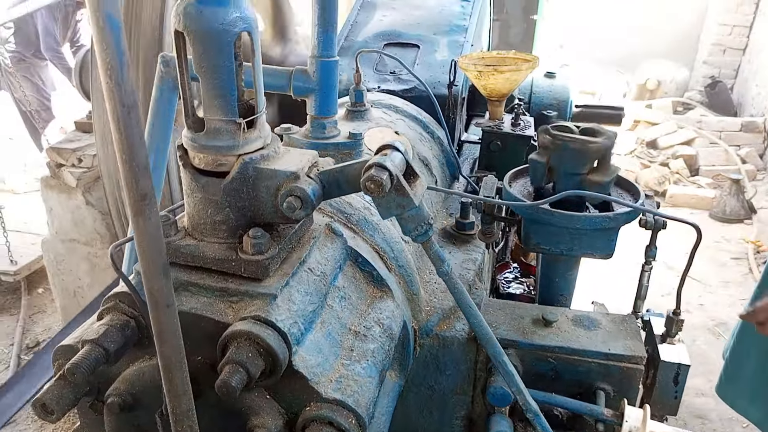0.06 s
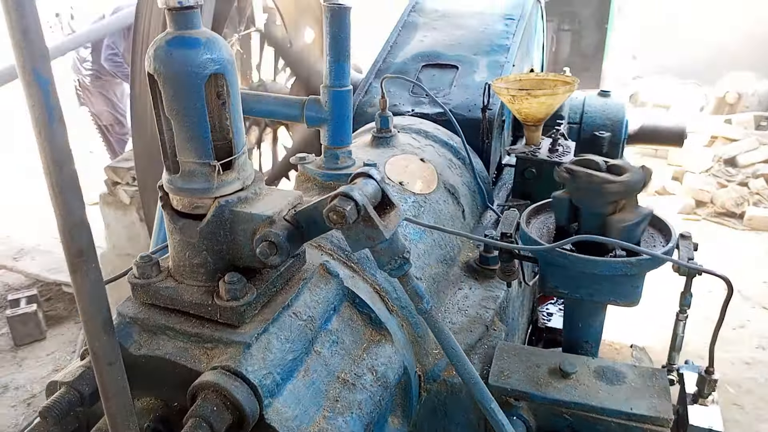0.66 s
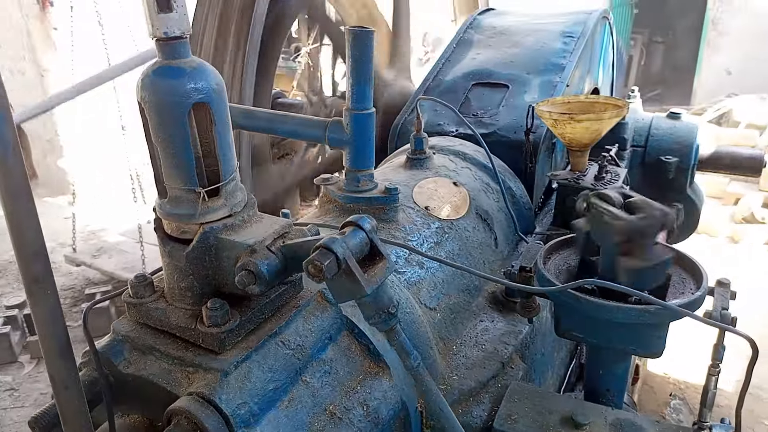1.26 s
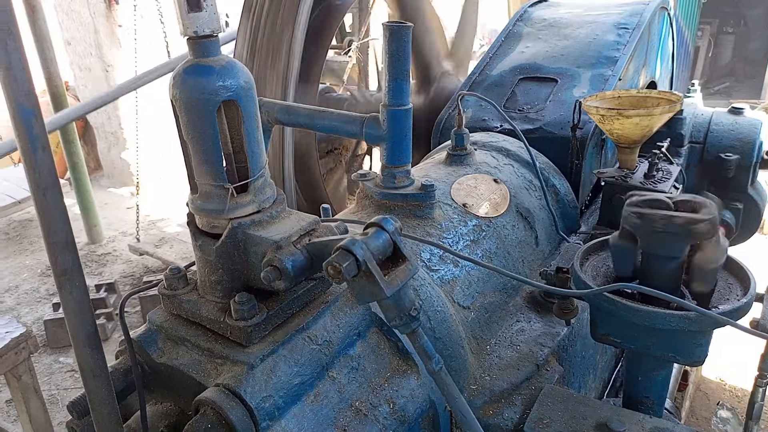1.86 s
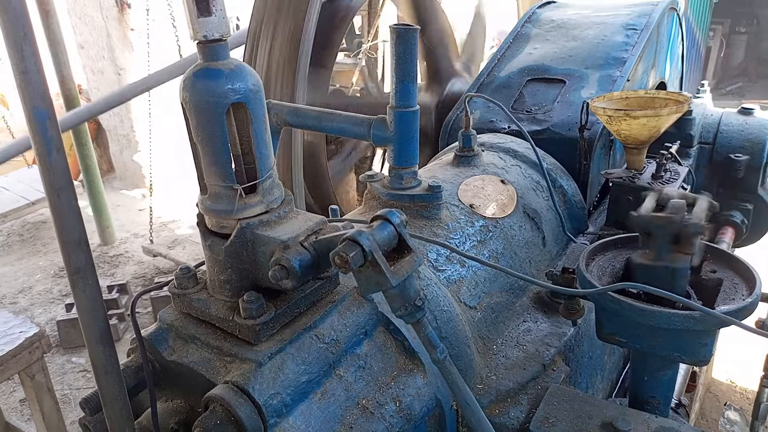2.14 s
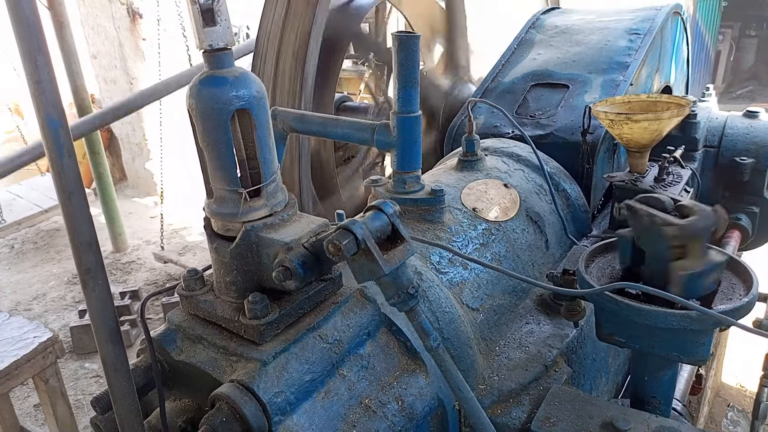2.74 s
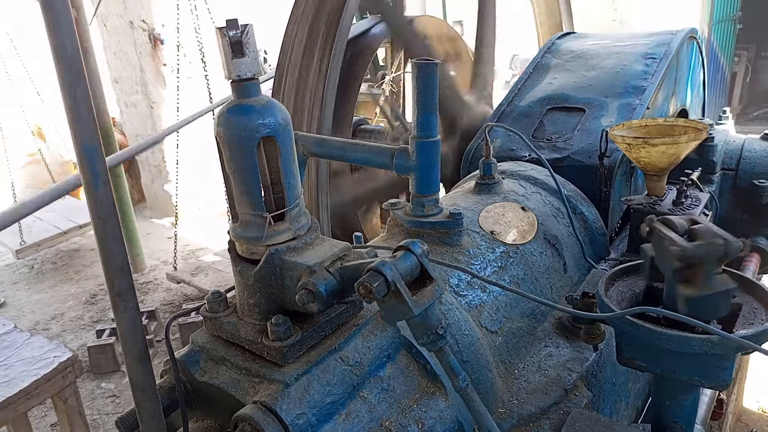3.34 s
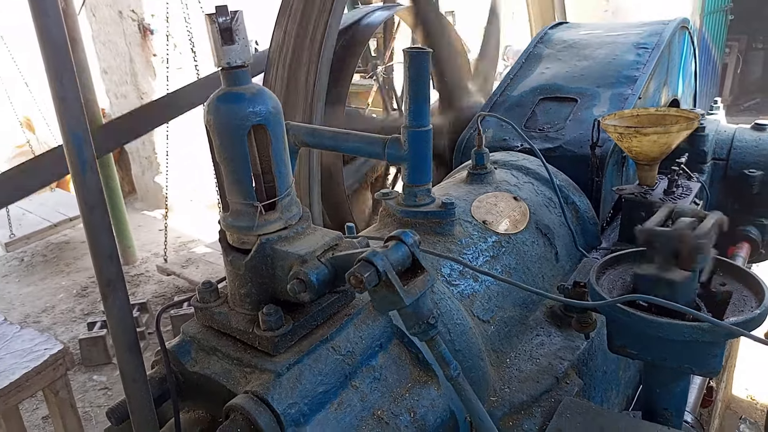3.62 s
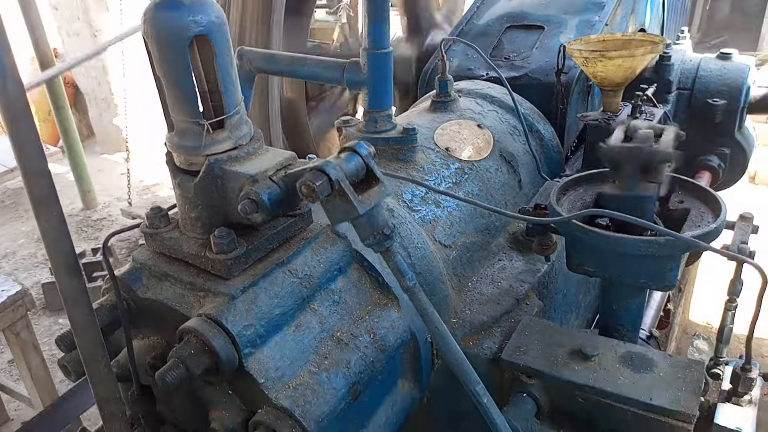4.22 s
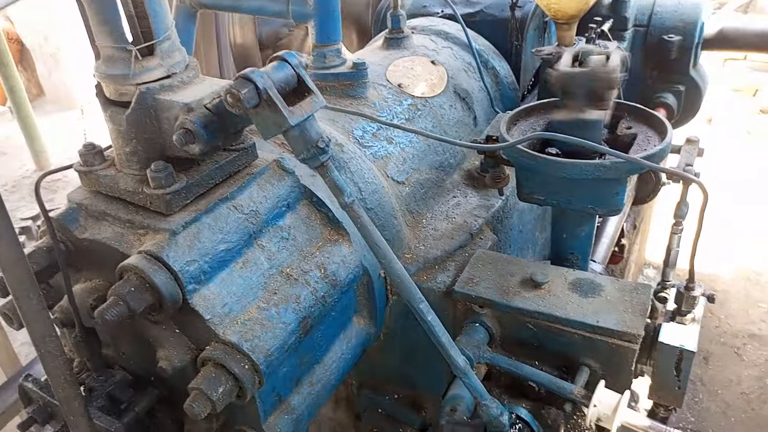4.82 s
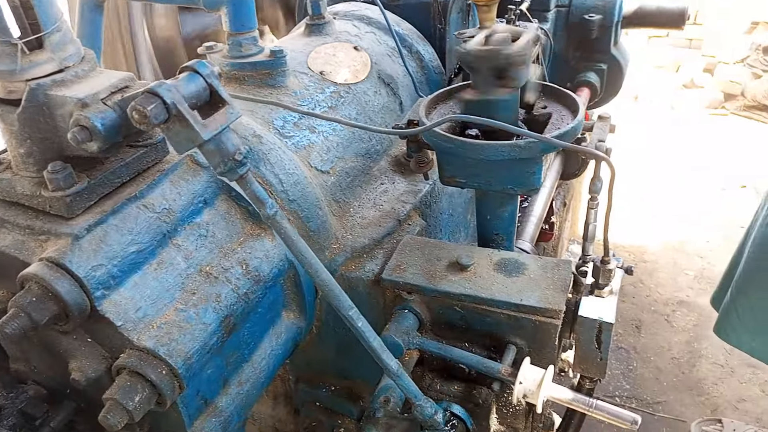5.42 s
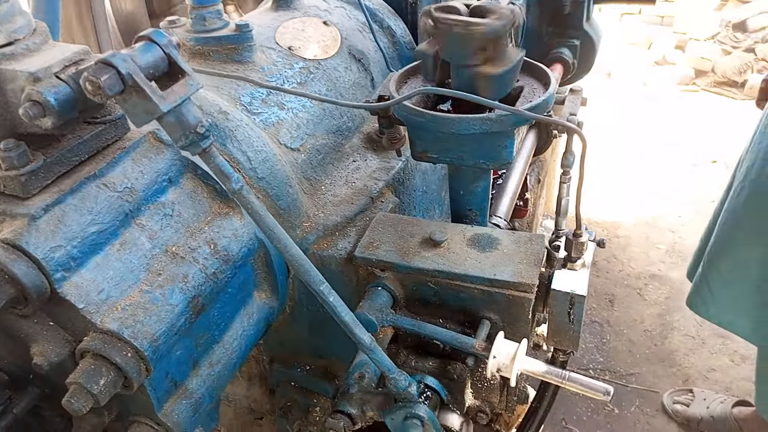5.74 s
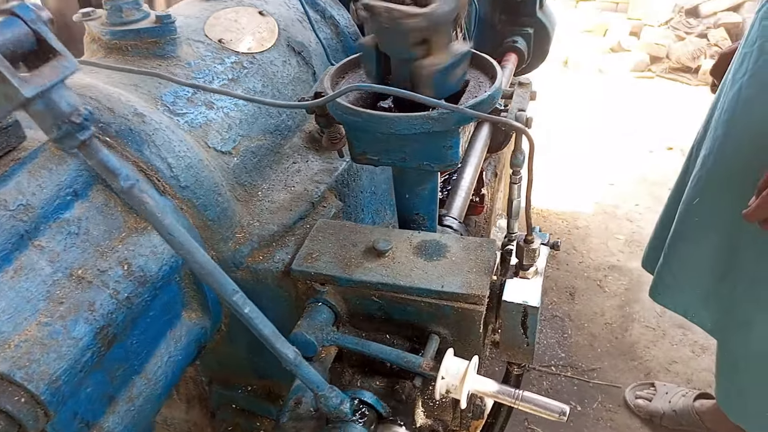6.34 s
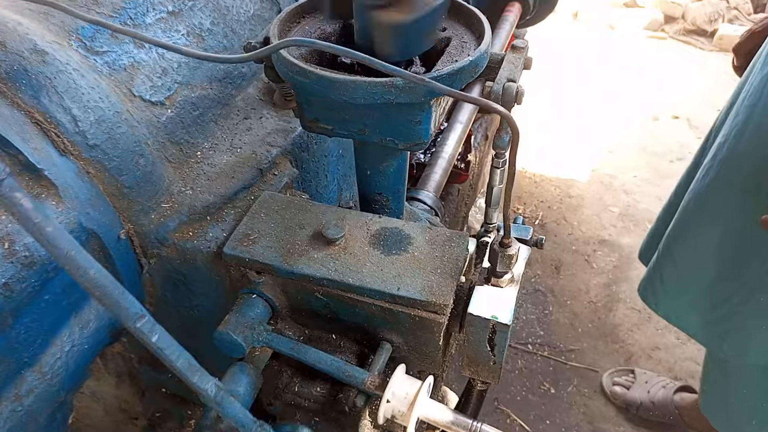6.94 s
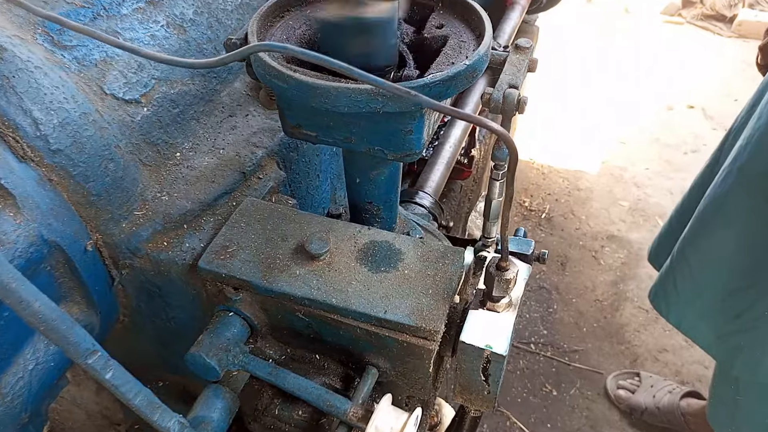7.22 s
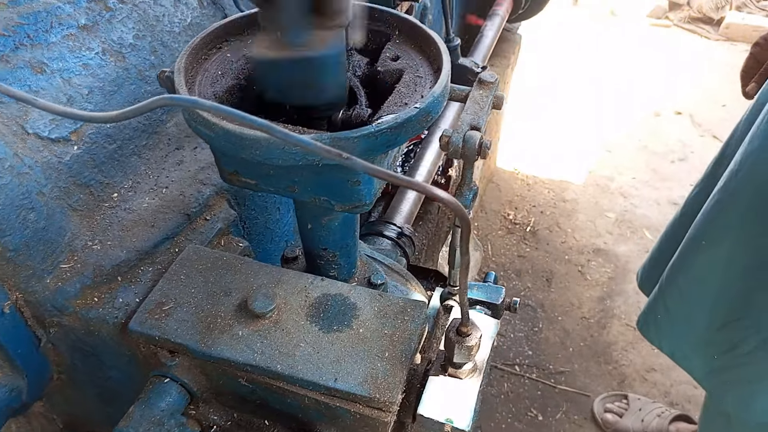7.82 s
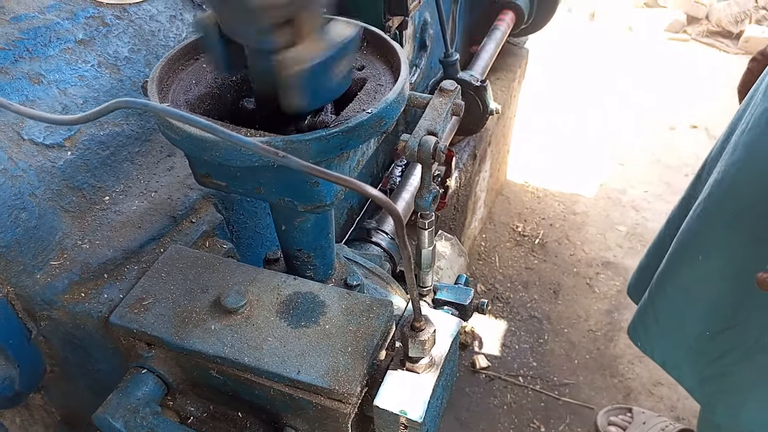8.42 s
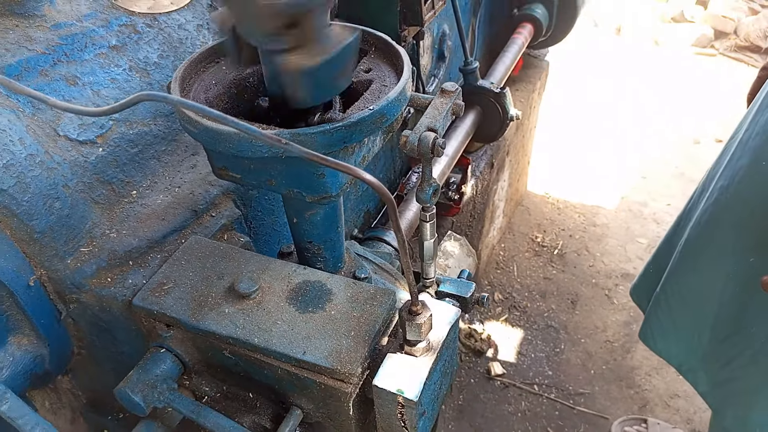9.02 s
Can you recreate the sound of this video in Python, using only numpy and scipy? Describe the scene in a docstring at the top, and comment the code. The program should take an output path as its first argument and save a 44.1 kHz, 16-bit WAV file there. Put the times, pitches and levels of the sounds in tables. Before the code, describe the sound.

An old slow-running diesel engine knocks and clatters evenly, about two beats a second, with exhaust chuffs and light metallic clinks.

```python
"""A slow, heavy clatter and chuff, about two beats a second: a big single-cylinder diesel in a workshop.
In each four-stroke cycle the intake gulps, the firing excites the modes of the cast iron and the hollow
crankcase, a tappet clicks, and the exhaust releases a pulse of gas. Behind these, gears sizzle, the
flywheel rumbles, dry spots squeal by stick and slip, and loose links clink. The balance of the modes
shifts as the listener moves from the cylinder head along the barrel to the governor."""
import sys
import numpy as np
from scipy import signal
from scipy.fft import rfft, irfft
from scipy.io import wavfile
from scipy.ndimage import uniform_filter1d

SR = 44100
rng = np.random.default_rng(int(sys.argv[2]) if len(sys.argv) > 2 else 0)


def bounce(signal):
    """Save signal as a 16-bit WAV file at the path given by the first command-line argument."""
    frames = np.transpose(np.atleast_2d(signal))
    limited = np.clip(frames, -1, 1)
    pcm = np.round(limited * 32767).astype(np.int16)
    wavfile.write(sys.argv[1], SR, pcm)


N = 399987
TAPS, SHOT = 4096, 16384  # samples in a filter and in one event
FREQ = np.maximum(np.arange(TAPS // 2 + 1) * SR / TAPS, 1)
AGE = np.arange(SHOT) / SR
TIME = np.arange(N) / SR
FIRST_CYCLE_S = -.046
# delays after the exhaust valve opens, which starts a cycle
ECHO_S, SEAT_S, INTAKE_S, FIRING_S, TAPPET_S = .019, .087, .235, .338, .411

# Levels in all tables are relative.
# path of the listener: t/s, place (0 head, 1 barrel, 2 governor)
LISTENER_PATH = [(0, 0), (3.6, 0), (4.5, 1), (6.5, 1), (7.0, 2), (9.1, 2)]
# crank speed, held almost steady by the governor: t/s, speed/rpm
CRANK_SPEED = [(0, 232.5), (3.5, 233.3), (7.2, 232.6), (8.3, 231.6)]
# running gear (valves, cams, gears, flywheel): t/s, level/dB
RUNNING_LEVEL = [(.45, -9.5), (1.5, 0.5), (2.68, -12.5), (3.0, -5), (3.55, -5.5), (4.3, 0.5), (6.15, 3.5),
                 (6.65, -2.5), (7.3, -6), (7.7, 0), (8.2, 5), (9, 5.5)]
# load on the gears: fraction of the cycle, level/dB
CAM_LOAD_CURVE = [(0, 5), (.06, 4.5), (.23, 1.5), (.28, -7.5), (.42, -4.5), (.54, 0), (.66, 9.5), (.76, 2),
                  (.87, 4), (.97, -2.5)]
# stick-slip at dry spots on the side shaft: t/s, f/Hz, level/dB, half-width/s
SQUEAL_EVENTS = [(3.6, 6450, -27.5, 0.0075), (3.65, 6380, -39.5, 0.023), (4.27, 6500, -40, 0.16),
                 (5.07, 6020, -39, 0.023), (5.17, 6300, -51, 0.014), (6.19, 6600, -29.5, 0.021),
                 (6.238, 6220, -25.5, 0.015), (7.79, 6800, -36, 0.021)]
# modes of the bevel wheels: f/Hz, level/dB
BEVEL_MODES = [(4450, 10), (5700, -2.5), (5950, 1.5), (6240, 3.5), (6460, 6), (7050, 3.5)]
# loose links, governor weights and pings of the push rod: t/s, level/dB, ring f/Hz, ring over rattle/dB, rattle
# t60/s
CLINK_EVENTS = [(0.021, -7, 4400, -7, 0.26), (0.045, -12, 3360, 2.5, 0.04), (0.522, -8, 1706, -9, 0.15),
                (0.559, -18.5, 3410, 6, 0.05), (0.595, -14, 1870, -4, 0.13),
                (1.074, -19.5, 3440, 6.5, 0.11), (1.446, -13, 1053, -3, 0.12),
                (2.784, -16.5, 3720, -11, 0.44), (2.945, -24.5, 3510, 13.5, 0.056),
                (3.247, -11, 2940, -6, 0.16), (3.291, -14, 3320, -20, 0.16), (3.71, -17.5, 1840, -11, 0.25),
                (4.215, -9.5, 3500, -37, 0.17), (4.628, 1.5, 4100, -8.5, 0.17),
                (5.134, -9.5, 3400, -13, 0.094), (6.055, -13, 3270, -21, 0.13),
                (7.394, -18.5, 1920, -12, 0.48), (7.906, -3, 1185, -10, 0.18),
                (7.907, -6.5, 3380, 0.5, 0.035), (8.325, -13, 2880, -9, 0.21),
                (8.831, -10.5, 2790, 1, 0.23)]
# modes of the cast iron: f/Hz, width/Hz, level/dB at the head, at the barrel, at the governor
IRON_MODES = [(183, 22, -6, -6.5, -3), (253, 34.5, -10.5, -11, -32), (386.3, 8.3, -34, -8, 13),
              (424, 64, -27, -6.5, 0.5), (600, 160, -24, -22.5, -9), (898, 140, -7, -7, -27),
              (1126, 110, -4, -4, -5), (1250, 43, -20, -7, -18), (1355, 164, -8.5, -3.5, 0),
              (1777, 29, -18, -9.5, -3), (2010, 150, -15, -11, -7.5), (2260, 80, -10, -5, -4),
              (2600, 132, -1.5, -6.5, -1), (2758, 65, -0.5, -3, -25), (3170, 94, -1, -6.5, -2.5),
              (3650, 36, -21, -12.5, -6), (3665, 340, 2.5, -51, -5.5), (3720, 52, -20, -7, -9),
              (4120, 100, 1.5, -10, -11), (4220, 710, -12, -10.5, -7), (4490, 62, -2, -27, -7),
              (5520, 154, -4.5, -12, -9), (5850, 200, -36, -8.5, -7), (5970, 450, -8.5, -34, -32),
              (6760, 250, -35, -10.5, -49.5), (6940, 396, -11.5, -37.5, -7.5)]
# drift of the firing knock: t/s, level/dB, delay/s
FIRING_DRIFT = [(.28, -13.5, -0.0069), (1.32, -11, -0.001), (2.35, -13.5, -0.005), (2.87, -15.5, -0.0012),
                (3.38, -13.7, -0.0044), (4.6, -14, .006), (6.3, -12.5, .006), (6.98, -13, -0.0036),
                (9.06, -11.5, 0.0026)]
# jolts that take up the slack ahead of a knock's crest: t/s
JOLT_TIMES = [.245, .766, 1.284, 1.802, 3.36, 5.426, 5.94, 6.967, 7.983]
# hard piston slaps within the knocks: t/s, level/dB
PISTON_SLAPS = [(0.275, -14), (0.798, -10), (0.811, 3), (1.308, -15), (2.373, 7.5), (2.861, -18),
                (3.373, -26), (4.413, 3), (5.96, 1), (6.985, 3), (8.01, 5), (8.039, 4)]

# spectral envelopes: f/Hz, level/dB
ROOM_SPECTRUM = [(60, 5.5), (200, 5.5), (1000, 3.5), (4000, -5.5), (7800, 3.5)]  # reverberant tail
FLYWHEEL_SPECTRUM = [(20, -28), (70, -4), (140, 7), (300, 9.5), (600, 3.5), (1100, 2), (1800, 5.5),
                     (3200, 9.5), (5000, 0.5), (7800, -34)]  # flywheel, belt and bearings
GEAR_SPECTRUM = [(200, -18), (1000, -1), (2000, 0), (3400, -1), (4300, -6), (5000, 0), (5700, 2.5),
                 (6450, 5.5), (7200, 6.5), (7800, -1)]  # tooth contacts
LINK_SPECTRUM = [(80, -46), (300, -18), (900, -11), (1200, -14.5), (1600, -8.5), (2700, -7), (3300, -1.5),
                 (3700, -4.5), (4200, -5), (5000, -10.5), (6500, -6), (7800, -16.5)]  # struck links and pins
CAM_SPECTRUM = [(80, -50), (160, -12), (250, -2.5), (320, 6), (400, -7.5), (540, -16.5), (660, -18),
                (750, -10), (870, -25.5), (3000, -19.5)]  # thump of the cam
TAPPET_SPECTRUM = [(800, -36), (1500, -26), (2800, -1), (3400, -10), (4300, -1.5), (5000, -9), (6200, 2),
                   (7800, -6)]  # tappet and valve seat
INTAKE_SPECTRUM = [(60, -39), (125, 1.5), (220, 2.5), (370, 1), (550, -8.5), (670, -5.5), (780, -2.5),
                   (940, -4.5), (1300, -26), (5000, -15)]  # indrawn air
POP_SPECTRUM = [(110, -32.5), (250, -13), (340, -8), (440, 6), (570, -8), (680, -10.5), (1300, -35)]  # exhaust port cracking open
CHUFF_SPECTRUM = [(70, -59), (115, -15.5), (160, -10), (215, -15), (330, 3.5), (400, -4.5), (460, -6),
                  (570, -2), (660, -13.5), (800, -5), (1100, -11), (1500, -17), (4000, -52)]  # exhaust pulse
GAS_SPECTRUM = [(500, -24), (1300, -10), (2200, -1), (3400, 9), (4200, 4), (5000, 4), (6400, -32),
                (7800, -26)]  # rush of exhaust gas
PIPE_SPECTRUM = [(70, -46), (125, -10), (170, 2), (260, -4.5), (380, -20), (800, -36)]  # reflection from the pipe's end
CRANKCASE_SPECTRUM = [(80, -36.5), (170, -17), (260, -3.5), (310, -9), (385, -2.5), (460, -6.5),
                      (550, -21.5), (800, -11.5), (2000, -51)]  # boom of the cavity
IMAGE_SPECTRUM = [(8350, -16.5), (9000, -48), (10000, -37), (11100, -29.5), (12000, -59), (13000, -57),
                  (14500, -50.5)]  # mirror image above the passband


def amp(db):
    """Amplitude ratio of a level in decibels."""
    return 10 ** (np.asarray(db) / 20)


def unit(x):
    """Normalisation to rms 1."""
    return x / np.sqrt(np.mean(x ** 2))


def unit_onset(x):
    """Normalisation of a transient to rms 1 over its first 30 ms."""
    return x / np.sqrt(np.mean(x[:int(.03 * SR)] ** 2))


def decay(t60):
    """Exponential damping, 60 dB in t60 seconds."""
    return np.exp(-np.log(1000) * AGE / t60)


def add(track, s, sound):
    """Superposition of a sound on the track, starting at time s."""
    start = int(s * SR)
    at = np.arange(max(start, 0), min(start + len(sound), N))
    track[at] += sound[at - start]


def curve(table, s, column=1):
    """Linear interpolation of a table column at time s."""
    columns = np.transpose(table)
    return np.interp(s, columns[0], columns[column])


def minimum_phase(x, db):
    """Causal filtering by the folded cepstrum, with gain db at each of FREQ."""
    cepstrum = irfft(np.log(amp(db)))
    cepstrum[1:TAPS // 2] *= 2
    cepstrum[TAPS // 2 + 1:] = 0
    response = irfft(np.exp(rfft(cepstrum)))
    return signal.oaconvolve(x, response)[:len(x)]


def colour(x, spectrum):
    """Spectral shaping by an envelope interpolated in log frequency."""
    hz, db = np.transpose(spectrum)
    return minimum_phase(x, np.interp(np.log(FREQ), np.log(hz), db))


def resonance(x, hz, width_hz):
    """Response of one damped mode with the given half-power bandwidth."""
    return minimum_phase(x, -10 * np.log10(1 + ((FREQ - hz) / width_hz * 2) ** 2))


def impacts(size, rate, spread_db):
    """Shot noise: random collisions, rate a second, of log-normal strength."""
    out, at = np.zeros(size), np.flatnonzero(rng.random(size) < rate / SR)
    out[at] = rng.choice([-1, 1], len(at)) * amp(spread_db * rng.standard_normal(len(at)))
    return unit(out)


def dispersion(t60, colouring):
    """Dispersion of bending waves: a response that smears a blow in time and hardly colours it."""
    spectrum = rfft(rng.standard_normal(SHOT) * decay(t60))
    return irfft(spectrum * abs(spectrum) ** (colouring - 1), SHOT)


def place(s):
    """Position of the listener along the engine at time s."""
    return curve(LISTENER_PATH, s)


def level(s, head_db, place_db, follow):
    """Gains add in decibels: level at the head, change per place, and a share of the running level."""
    return head_db + place_db * place(s) + follow * curve(RUNNING_LEVEL, s)


def cycle_starts():
    """Phase is the integral of speed: the exhaust valve opens once in two turns of the crank."""
    t = FIRST_CYCLE_S + TIME
    cycles_done = np.cumsum(curve(CRANK_SPEED, t)) / (2 * 60 * SR)
    return np.interp(np.arange(np.ceil(cycles_done[-1])), cycles_done, t)


def firing_crests():
    """Timing drift: each knock crests slightly off its nominal point in the cycle."""
    s = cycle_starts() + FIRING_S
    return s + curve(FIRING_DRIFT, s, column=2)


def cam_load():
    """Periodic modulation, in dB, as the cams bear on the side shaft."""
    s = cycle_starts()
    phase = (TIME - s[0]) / np.mean(np.diff(s)) % 1
    return np.interp(phase, *np.transpose(CAM_LOAD_CURVE), period=1)


def strokes(times, levels, spectrum, attack_s, t60, fresh):
    """Repeated excitation: a damped response drifts slowly and gains a fresh random part each time."""
    out, (noise_a, noise_b) = np.zeros(N), rng.standard_normal((2, SHOT))
    envelope = (1 - np.exp(-AGE / attack_s)) * decay(t60)
    for s, db in zip(times, levels):
        angle = s / TIME[-1] * np.pi
        repeating = np.cos(angle) * noise_a + np.sin(angle) * noise_b
        response = repeating + fresh * impacts(SHOT, rate=2500, spread_db=5.2)
        add(out, s, amp(db) * unit_onset(colour(response * envelope, spectrum)))
    return out


def workshop(x, t60=0.48, wet_db=-14, build_s=0.0021):
    """Reverberation: floor, walls and roof add a short diffuse tail."""
    reflections = rng.standard_normal(SHOT) * decay(t60) * (1 - np.exp(-AGE / build_s))
    tail = colour(reflections, ROOM_SPECTRUM)
    return x + amp(wet_db) * signal.oaconvolve(x, tail / np.linalg.norm(tail))[:N]


def flywheel():
    """Dense shot noise: flywheel, belt and bearings merge into a continuous rumble."""
    rumble = colour(impacts(N, rate=3000, spread_db=0.48), FLYWHEEL_SPECTRUM)
    return unit(rumble) * amp(level(TIME, head_db=-44, place_db=-1.06, follow=0.4))


def joints():
    """Sparse impacts: pins and joints tick at random, hardest under cam load."""
    hits = impacts(N, rate=28, spread_db=3)
    tick = (rng.standard_normal(SHOT) * decay(t60=.05))[:TAPS]
    ticks = colour(signal.oaconvolve(hits, tick)[:N], LINK_SPECTRUM)
    return unit(ticks) * amp(level(TIME, head_db=-45, place_db=0.5, follow=1) + cam_load())


def squeals():
    """Stick-slip friction drives one high mode for a moment."""
    out, t = np.zeros(N), AGE - AGE.mean()
    for s, hz, db, half_width_s in SQUEAL_EVENTS:
        tone = unit(resonance(impacts(SHOT, rate=1000, spread_db=0.88), hz, width_hz=90))
        add(out, s + t[0], amp(db) * tone * np.exp(-.5 * (t / half_width_s) ** 2))
    return out


def gears(singing_db=-5, wander_db=4):
    """Sliding contact: gears and oily slides sizzle with cam load and excite the bevel wheels' modes."""
    teeth = colour(impacts(N, rate=2500, spread_db=1.5), GEAR_SPECTRUM)
    singing, knots_s = np.zeros(N), np.linspace(0, TIME[-1], 150)
    for hz, mode_db in BEVEL_MODES:
        # each mode comes and goes as the teeth scrape
        wander = np.interp(TIME, knots_s, rng.standard_normal(len(knots_s)))
        singing += resonance(teeth, hz, width_hz=110) * amp(mode_db + wander_db * wander)
    db = level(TIME, head_db=-34.5, place_db=-0.27, follow=0.67) + cam_load()
    return unit(unit(teeth) + amp(singing_db) * unit(singing)) * amp(db)


def clinks(ring_t60=0.054, beat_hz=45, crack_db=5, crack_t60=0.0055, crest_factor_db=17):
    """Free vibration: a loose link snaps over with a crack, a rattle and two close modes that beat."""
    out = np.zeros(N)
    attack = 1 - np.exp(-AGE / .0018)
    for s, db, hz, ring_db, t60 in CLINK_EVENTS:
        envelope = (decay(t60) + amp(crack_db) * decay(crack_t60)) * attack
        rattle = unit_onset(colour(impacts(SHOT, rate=4000, spread_db=3.3) * envelope, LINK_SPECTRUM))
        lower = np.sin(2 * np.pi * hz * AGE)
        upper = .5 * np.sin(2 * np.pi * ((hz + beat_hz) * AGE + rng.random()))
        ring = unit_onset((lower + upper) * attack * decay(ring_t60))
        add(out, s, amp(db - crest_factor_db) * (rattle + amp(ring_db) * ring))
    return out


def valves():
    """Impact excitation: the cam thumps; the tappet and the seating valve both ring the push rod."""
    starts = cycle_starts()
    lift, close = starts + TAPPET_S, starts + SEAT_S
    thump_db = level(lift, head_db=-29, place_db=0.4, follow=0.82)
    thump = strokes(lift, thump_db, CAM_SPECTRUM, attack_s=0.0013, t60=0.034, fresh=0.41)
    tappet_db = level(lift, head_db=-29, place_db=-1, follow=0.41)
    tappet = strokes(lift, tappet_db, TAPPET_SPECTRUM, attack_s=0.0096, t60=0.11, fresh=1)
    seat_db = level(close, head_db=-37.5, place_db=-7, follow=.6)
    seat = strokes(close, seat_db, TAPPET_SPECTRUM, attack_s=0.036, t60=0.11, fresh=0.78)
    contacts = tappet + seat
    # the push rod is clearest near the cylinder head
    push_rod = resonance(contacts, hz=3502, width_hz=93) * amp(22.5 - 6.9 * place(TIME))
    return thump + contacts + push_rod


def intake():
    """Flow noise: the cylinder gulps air once a cycle."""
    s = cycle_starts() + INTAKE_S
    db = level(s, head_db=-36.5, place_db=1.1, follow=0.39)
    return strokes(s, db, INTAKE_SPECTRUM, attack_s=0.0038, t60=0.8, fresh=1)


def exhaust():
    """Pressure release: a hollow pop, a chuff and a rush of gas, then a low reflection down the pipe."""
    s = cycle_starts()
    db = level(s, head_db=-31, place_db=0.7, follow=0.67)
    pop = strokes(s - .001, db, POP_SPECTRUM, attack_s=0.0003, t60=0.077, fresh=0.56)
    chuff = strokes(s - .0008, db + 0.5, CHUFF_SPECTRUM, attack_s=0.00063, t60=0.26, fresh=0.27)
    echo = strokes(s + ECHO_S, db - 5, PIPE_SPECTRUM, attack_s=0.0017, t60=0.056, fresh=0.71)
    gas_db = level(s, head_db=-34, place_db=-2.2, follow=0.76)
    gas = strokes(s - .004, gas_db, GAS_SPECTRUM, attack_s=0.024, t60=0.2, fresh=0.17)
    return pop + chuff + echo + gas


def crankcase(lead_s=.04):
    """Cavity resonance: each firing booms in the hollow crankcase."""
    s = firing_crests() - lead_s
    db = level(s, head_db=-30.5, place_db=-1.16, follow=0.63)
    return strokes(s, db, CRANKCASE_SPECTRUM, attack_s=0.017, t60=0.37, fresh=2.46)


def iron_response(s, scatter_db=1.24, floor_db=-22):
    """Modal summation: the casting's gain in dB at each of FREQ, from the listener's place at time s."""
    modes = np.array(IRON_MODES)
    hz, place_levels = modes[:, :1], modes[:, 2:]
    widths = np.maximum(modes[:, 1:2], .025 * hz)  # no mode of the iron is narrower than 2.5% of its frequency
    shapes = (1 + ((FREQ - hz) / widths) ** 2) ** -2.
    nearness = np.maximum(1 - abs(np.arange(3) - place(s)), 0)
    # the blows never land on quite the same spot
    scatter = amp(scatter_db * rng.standard_normal(len(modes)))
    power = amp(place_levels) ** 2 @ nearness * scatter ** 2
    # countless weak modes fill the valleys between the strong ones
    floor = amp(floor_db) ** 2 * (FREQ > hz.min())
    return 10 * np.log10(power @ shapes + floor)


def knocks(rise_s=0.013, fall_s=0.018, lead_s=.002, slack_db=-8, jolt_db=-14, jolt_s=0.011,
           slap_db=-3, slap_s=0.0026, crack_db=9):
    """Modal excitation: at each firing a swell of collisions in piston and bearings rings the iron."""
    out, from_crest = np.zeros(N), AGE - AGE.mean()
    swell = 1 / np.cosh(from_crest / np.where(from_crest < 0, rise_s, fall_s))
    for crest in firing_crests():
        t, force = crest + from_crest, swell
        gain = amp(curve(FIRING_DRIFT, crest))
        iron_db = iron_response(crest)
        crack = minimum_phase(signal.unit_impulse(TAPS), iron_db)
        for s in JOLT_TIMES:
            if t[0] < s < t[-1]:
                jolt = amp(jolt_db) * np.exp(-abs(t - s) / jolt_s)
                force = np.where(t < s, swell * amp(slack_db), swell + jolt)
        for s, db in PISTON_SLAPS:
            if t[0] < s < t[-1]:
                force = force + amp(db + slap_db) * (t > s) * np.exp(-abs(t - s) / slap_s)
                add(out, s, gain * amp(db + crack_db) * crack / abs(crack).max())
        # the parts bounce, so the collisions come in bunches a few milliseconds long
        bunches = amp(2 * unit(uniform_filter1d(rng.standard_normal(SHOT), size=150)))
        collisions = force * bunches * impacts(SHOT, rate=2600, spread_db=2)
        blows = signal.fftconvolve(collisions, dispersion(t60=0.037, colouring=0.44))[:SHOT]
        clatter = unit(minimum_phase(blows, iron_db))
        add(out, t[0] - lead_s, gain * clatter * np.sqrt(np.mean(force ** 2)))
    # a casting cannot radiate deep bass
    return signal.sosfilt(signal.butter(4, 150, "highpass", fs=SR, output="sos"), out)


def scene():
    """Superposition of the engine's sources in the reverberant workshop, in one channel."""
    beat = knocks() + crankcase() + valves() + exhaust() + intake()
    engine = beat + gears() + squeals() + flywheel() + joints() + clinks()
    return workshop(engine)[None]


def record(dry, ceiling=.72, band_hz=7650, carrier_hz=16000, top_hz=15700):
    """Saturation and band limiting: rounded peaks, a steep cut and a faint spectral image above it."""
    rounded = ceiling * np.tanh(dry / ceiling)
    band = signal.sosfilt(signal.ellip(10, .3, 70, band_hz, fs=SR, output="sos"), rounded)
    image = colour(band[0] * 2 * np.cos(2 * np.pi * carrier_hz * TIME), IMAGE_SPECTRUM)
    return signal.sosfilt(signal.ellip(8, .2, 70, top_hz, fs=SR, output="sos"), band + image)


dry = scene()
out = record(dry)
bounce(out)
```